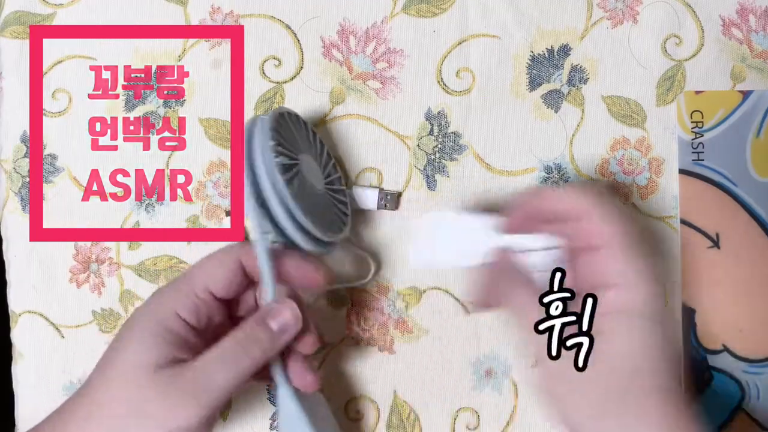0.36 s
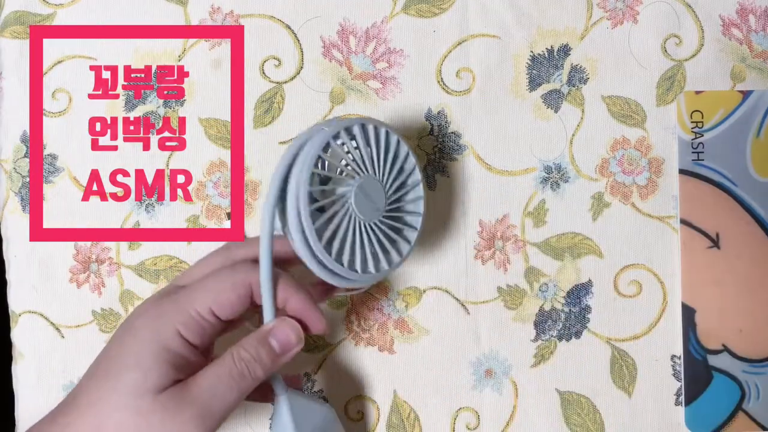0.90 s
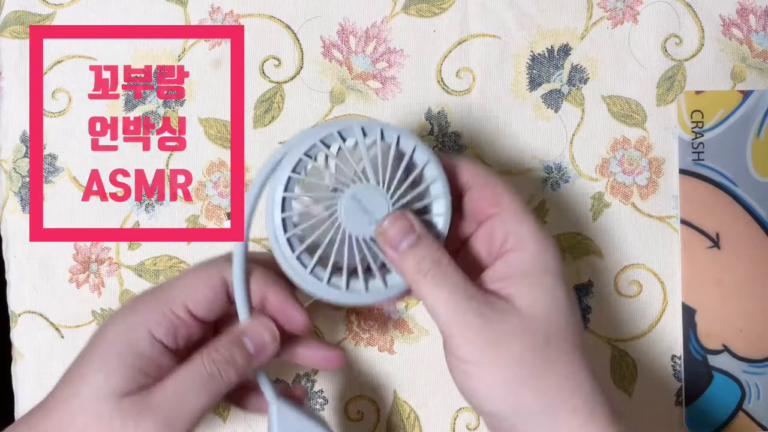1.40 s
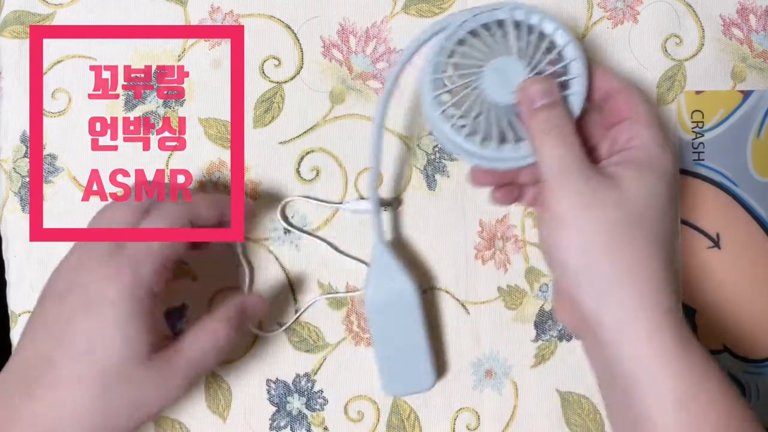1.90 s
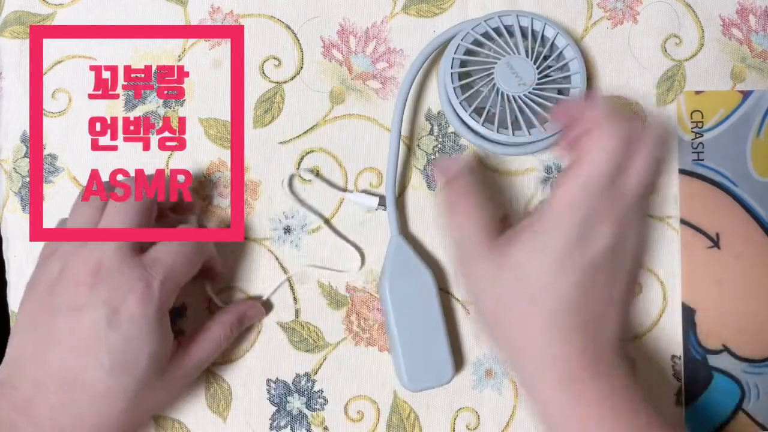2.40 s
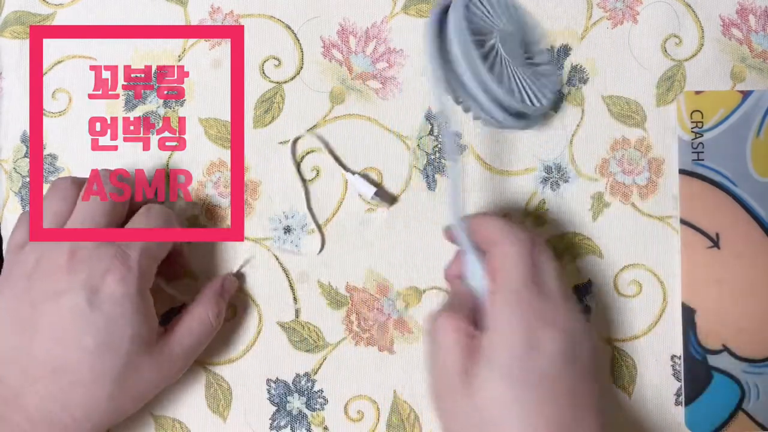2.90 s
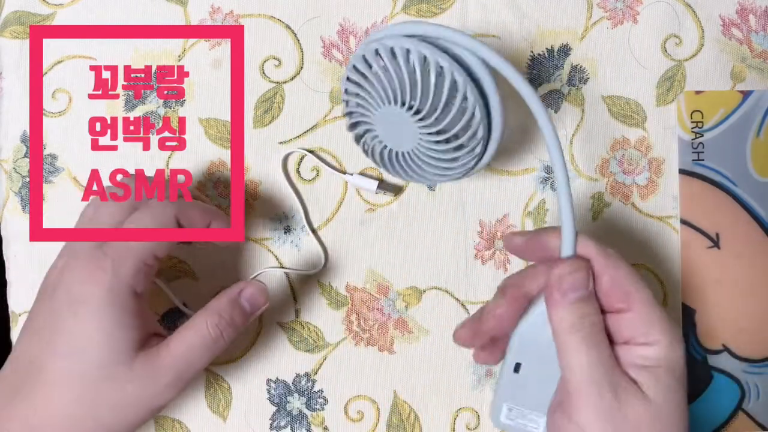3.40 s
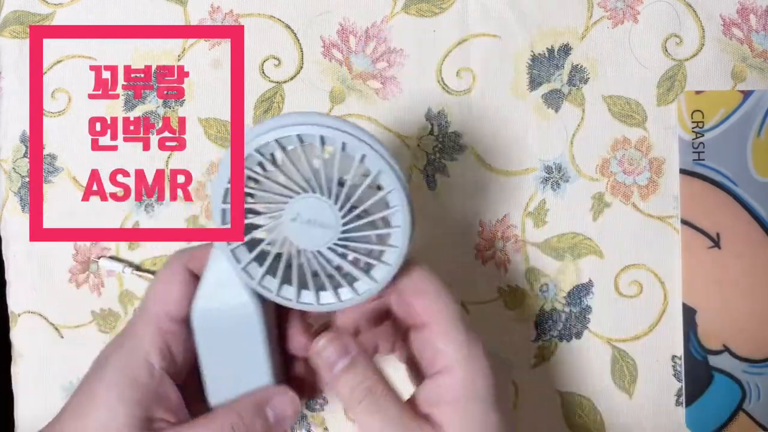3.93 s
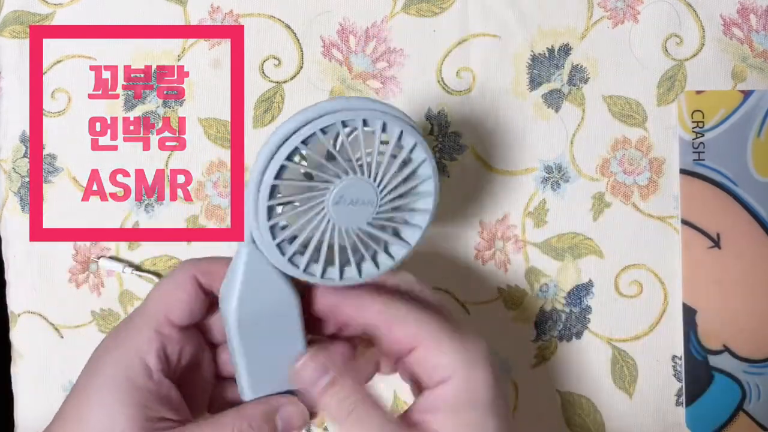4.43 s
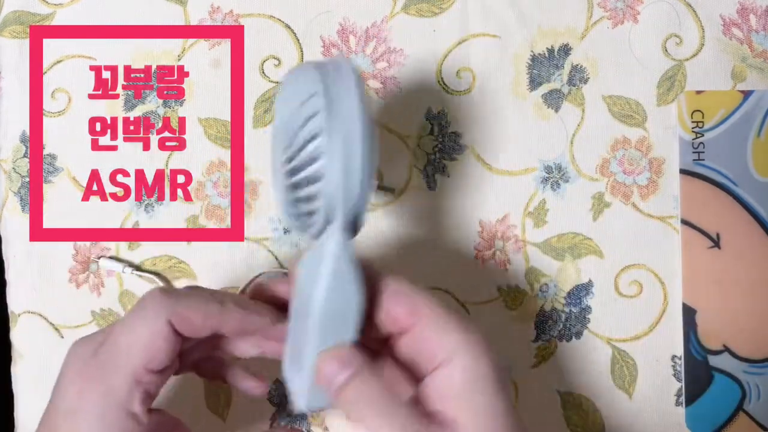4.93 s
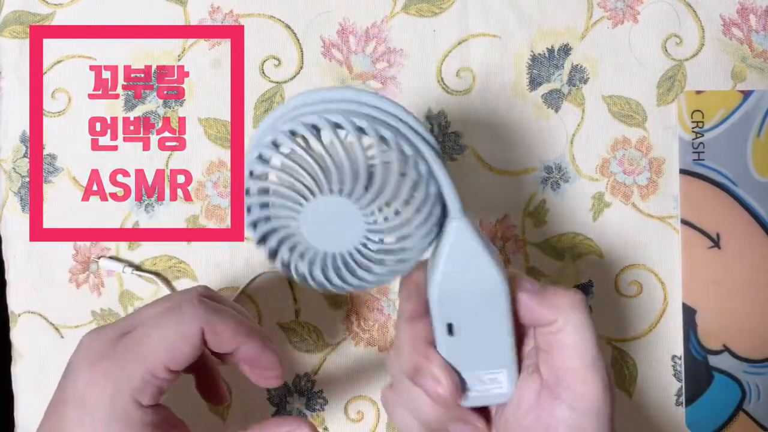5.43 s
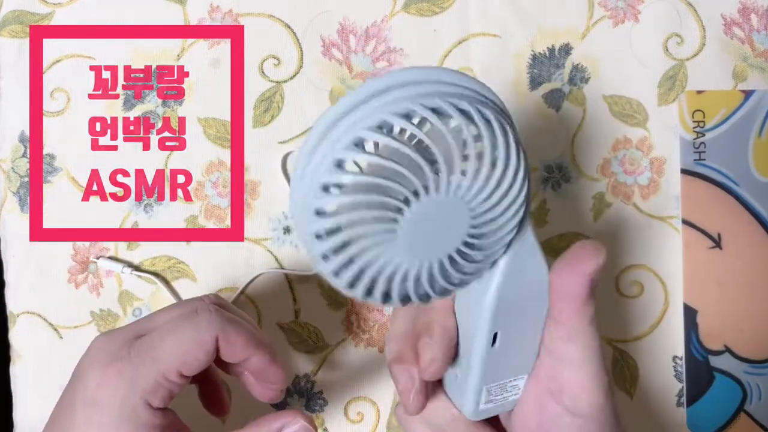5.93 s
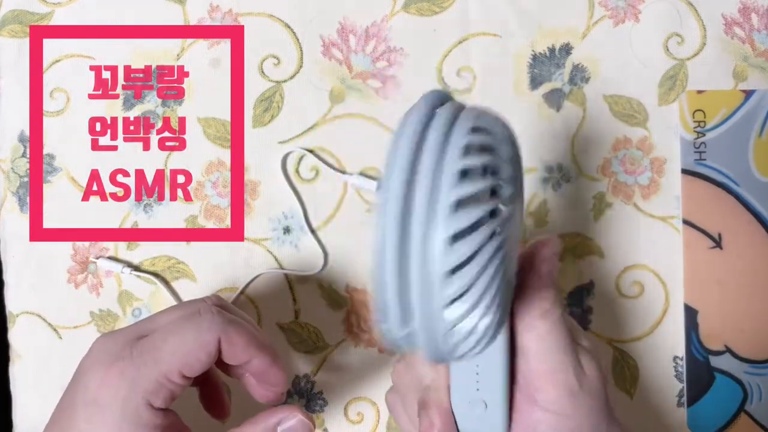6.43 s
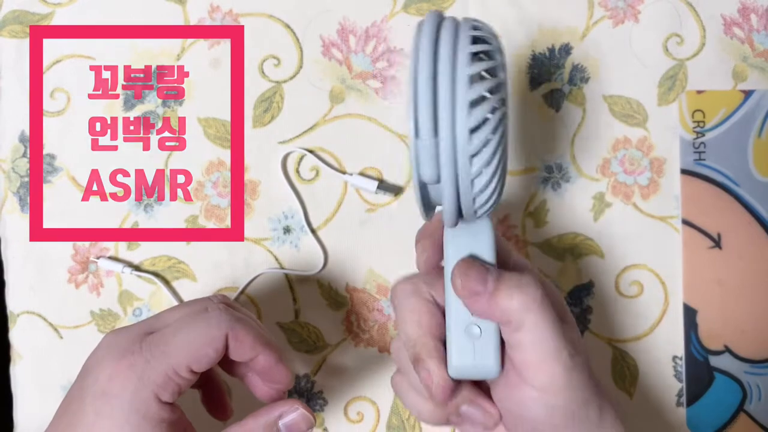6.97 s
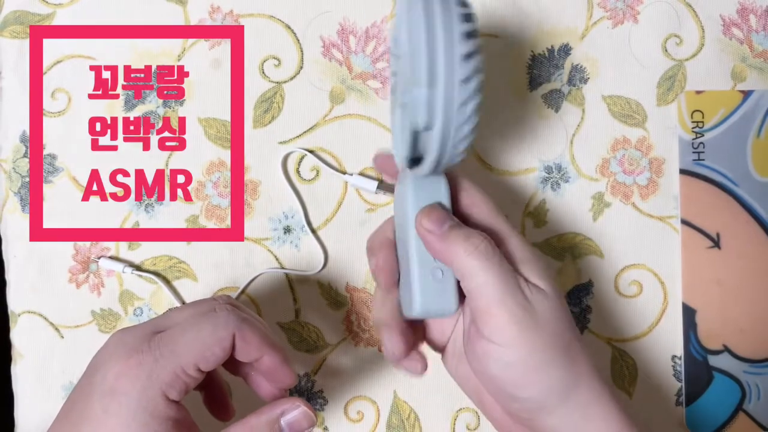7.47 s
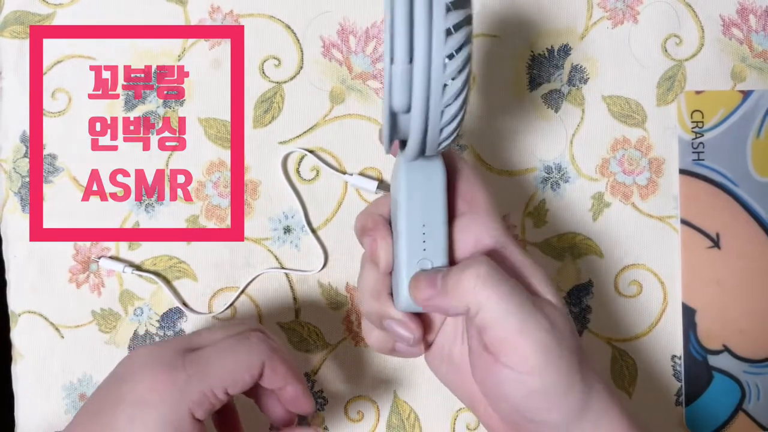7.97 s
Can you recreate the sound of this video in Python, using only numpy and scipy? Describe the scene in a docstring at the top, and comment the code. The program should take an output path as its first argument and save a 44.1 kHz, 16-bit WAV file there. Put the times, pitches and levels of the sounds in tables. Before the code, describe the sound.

Close plastic handling in a quiet room: a tossed scrap clacks down, the fan bumps a clothed table, then rubs and ticks continue.

```python
"""A quiet room: hands turn a small plastic fan and its cable over a cloth-covered table, close to the microphone.
Skin slides and squeaks on the shell as noise driving its resonances; parts tick as snaps and short puffs of noise
through a narrow resonance, a broader one and a bright crack. The fan and wrists bump the table top in falling
sweeps that ring it; a tossed scrap bounces twice further off, a burst of coloured noise over a ringing thud.
Behind it all an appliance hums and rumbles as wavering tones and narrow noise bands, under the hiss of the air."""
import sys
import numpy as np
from scipy import signal
from scipy.fft import rfft, irfft
from scipy.io import wavfile
from scipy.ndimage import uniform_filter1d

SR = 44100
rng = np.random.default_rng(int(sys.argv[2]) if len(sys.argv) > 2 else 0)


def decibels_to_gain(level_db):
    """Convert a level in decibels to a linear amplitude gain (20 dB per decade)."""
    exponent = np.asarray(level_db, float) / 20
    return 10 ** exponent


def dump(signal):
    """Clip the signal to [-1, 1] and save it as 16-bit WAV at the path in sys.argv[1]."""
    limited = np.clip(np.atleast_2d(signal).T, -1, 1)
    pcm = np.round(limited * 32767).astype(np.int16)
    wavfile.write(sys.argv[1], SR, pcm)


N = 356769  # length [samples]


def evened(x):
    """Scales to rms 1."""
    return x / np.sqrt(np.mean(x ** 2) + 1e-20)


def read(points, hz):
    """Reads a spectrum on a log-frequency axis."""
    f, value = np.transpose(points)
    return np.interp(np.log(hz + 1), np.log(f + 1), value)


def add(mix, s, sound):
    """Mixes a sound in at time s."""
    part = mix[round(s * SR):][:len(sound)]
    part += sound[:len(part)]


def resonate(x, hz, width):
    """Shifts hz down to zero, smooths with a one-pole, and shifts back: a resonance of gain 1."""
    turn = np.exp(2j * np.pi * np.cumsum(hz * np.ones(len(x))) / SR)
    r = np.exp(-np.pi * width / SR)
    return 2 * (turn * signal.lfilter([1 - r], [1, -r], x / turn)).real


def resonate_twice(x, hz, width, second_width):
    """Two resonances in a row at one pitch, for steeper skirts."""
    return resonate(resonate(x, hz, width), hz, second_width)


def coloured(x, points):
    """Filters by a spectrum, to rms 1."""
    gain = decibels_to_gain(read(points, np.fft.rfftfreq(len(x), 1 / SR)))
    return evened(irfft(rfft(x) * gain, len(x)))


def ringing(modes, t):
    """Sum of dying modes, peak 1."""
    ring = sum(decibels_to_gain(db - 60 * t / t60) * np.sin(2 * np.pi * hz * t) for hz, db, t60 in modes)
    return ring / abs(ring).max()


def wander(hz):
    """Slow chance movement up to hz, rms 1: twelve sines of random phase, the slow ones strongest."""
    t = np.arange(N) / SR
    rates = np.geomspace(hz / 20, hz, num=12)
    return evened(sum(np.sin(2 * np.pi * (f * t + rng.random())) / np.sqrt(f) for f in rates))


def sliding():
    """Tiny slips of skin hiss by themselves and ring the parts of the shell."""
    # colour of skin on plastic: (frequency [Hz], relative level [dB per Hz])
    skin_colour = [(1000, -10), (2000, -17), (4000, -8), (6500, -6), (9000, -7), (13500, -8),
                   (15500, -10.5), (16500, -38)]
    # resonances of the fan's parts: (frequency [Hz], width of the first pass [Hz], relative level [dB])
    handle = [(1750, 710, -4.5), (2400, 930, 3), (2750, 420, -1.5), (3160, 340, -3)]
    rim = [(3690, 1500, 2.5), (4350, 820, -6.5)]
    grille = [(5000, 690, 3), (5500, 590, -5), (6120, 1660, 1)]
    hiss, *ring_gains = strokes()
    # on average 1500 slips a second, of uneven size
    slips = decibels_to_gain(1.4 * np.minimum(rng.exponential(1, N), 5)) * (rng.random(N) < 1500 / SR)
    # the pressure of the grip flutters by 1.67 dB rms
    grip = decibels_to_gain(1.67 * evened(uniform_filter1d(rng.standard_normal(N), size=600)))
    drive = grip * (0.25 * evened(slips * rng.standard_normal(N)) + rng.standard_normal(N))
    rings = sum(gain * body(drive, part) for gain, part in zip(ring_gains, (handle, rim, grille)))
    sung, singing = squeaks()
    lock_db = -6  # a rub that sings on one mode feeds the others less
    skin = hiss * patchy(coloured(drive, skin_colour), db=2.5)
    return sung + decibels_to_gain(lock_db * singing) * rings + skin


def strokes():
    """Each stroke swells and fades; returns the gain of the hiss and of each part of the shell."""
    # strokes of the fingers: (middle [s], length [s], hiss of skin [dB], ring of the shell, shared out
    # among its parts [dB], pitch of the touched spot [Hz])
    finger_strokes = [(0.0, 0.061, -54, -60, 3770), (0.086, 0.031, -53, -60, 2930),
                      (0.192, 0.014, -62, -75, 3240), (0.328, 0.279, -61, -64.0, 3000),
                      (0.424, 0.057, -53.0, -63, 3050), (0.663, 0.066, -56, -67, 3540),
                      (0.79, 0.57, -76, -66.5, 3110), (1.238, 0.034, -58, -64, 4340),
                      (1.286, 0.19, -72.0, -74, 3650), (1.52, 0.23, -61.5, -82, 3560),
                      (1.603, 0.12, -69, -63.5, 3190), (1.758, 0.19, -64.5, -61, 2600),
                      (2.085, 0.31, -58, -60.5, 3450), (2.091, 0.047, -52.5, -56.5, 3680),
                      (2.342, 0.049, -55, -54, 3130), (2.522, 0.09, -55, -55.0, 3340),
                      (2.65, 0.13, -58, -59.0, 3130), (2.717, 0.086, -59, -64, 3040),
                      (2.787, 0.11, -54.5, -53.5, 3450), (3, 0.15, -58.5, -61, 3680),
                      (3.141, 0.097, -56.5, -53.5, 4400), (3.209, 0.053, -53.5, -50, 3890),
                      (3.37, 0.049, -55.5, -47.5, 2700), (3.511, 0.047, -63.0, -54.5, 2650),
                      (3.612, 0.05, -69, -59, 2770), (3.693, 0.099, -71.0, -61, 3670),
                      (3.895, 0.21, -58.5, -60.5, 4440), (4.093, 0.045, -61.5, -66, 4670),
                      (4.212, 0.055, -51.5, -64, 4470), (4.329, 0.16, -66, -74, 3180),
                      (4.498, 0.12, -70, -70.0, 2760), (4.57, 0.045, -71, -92.0, 3000),
                      (4.76, 0.13, -59, -64, 3320), (4.895, 0.053, -51, -55, 2700),
                      (4.901, 0.71, -74, -67, 2750), (5.014, 0.016, -58.5, -59, 3730),
                      (5.25, 0.056, -52.5, -45, 3280), (5.413, 0.17, -57.5, -58, 3570),
                      (5.492, 0.013, -54, -53, 3370), (5.564, 0.029, -61, -70, 3530),
                      (5.646, 0.1, -55.5, -57.5, 3090), (5.848, 0.062, -60, -60.5, 2730),
                      (6.026, 0.113, -84, -73, 2940), (6.123, 0.095, -76, -67.5, 2770),
                      (6.278, 0.18, -56.5, -60, 3970), (6.498, 0.093, -58, -65, 4350),
                      (6.583, 0.063, -56.5, -64, 3990), (6.741, 0.057, -59.5, -60.0, 3570),
                      (6.903, 0.21, -63, -63.5, 3450), (7.037, 0.11, -62.5, -58, 3640),
                      (7.182, 0.094, -58.0, -57, 3220), (7.34, 0.19, -65, -65.5, 3230),
                      (7.585, 0.081, -64.0, -61, 3990), (7.702, 0.117, -63.5, -63, 3760),
                      (7.825, 0.047, -61.0, -51.5, 4020), (7.975, 0.069, -77, -67.0, 3470)]
    # own pitch of handle, rim and grille: (frequency [Hz])
    part_hz = [2600, 4000, 5900]
    reach_octaves = 0.63  # how far a touch spreads to the next part
    edge_db, shape = -6.5, 1.37  # level at both ends of the length; shape 1 = pointed swell, 2 = round
    rest_hiss_db = -88  # hands merely holding
    t = np.arange(0, N + 64, 64) / SR
    s, length, hiss_db, ring_db, hz = np.transpose(finger_strokes)[:, :, None]
    swell_db = edge_db * abs(2 * (t - s) / length) ** shape
    near = np.exp(-(np.log2(hz / part_hz) / reach_octaves) ** 2)
    share = near / near.sum(axis=1, keepdims=True)
    # overlapping strokes add as powers
    rings = share.T @ decibels_to_gain(2 * (ring_db + swell_db))
    hiss = decibels_to_gain(2 * (hiss_db + swell_db)).sum(axis=0) + decibels_to_gain(2 * rest_hiss_db)
    return [np.interp(np.arange(N) / SR, t, np.sqrt(power)) for power in (hiss, *rings)]


def body(drive, modes):
    """Broad modes that share the energy differently as the contact moves over the part."""
    shift_db = 2.5  # how far the modes trade places, rms
    shares = [decibels_to_gain(db + shift_db * wander(hz=29.93)) for hz, width, db in modes]
    rings = [evened(resonate_twice(drive, hz, width, 1.56 * width)) for hz, width, db in modes]
    return sum(share * ring for share, ring in zip(shares, rings)) / np.linalg.norm(shares, axis=0)


def squeaks():
    """Rough noise through one narrow mode, swelling and fading with the rub; also returns when it sings."""
    # harder rubs that make one mode of the shell sing: (start [s], length [s], frequency [Hz], level [dB])
    rubs = [(0.64, 0.028, 2900, -62), (.645, 0.023, 6440, -54), (2.762, 0.029, 6460, -62),
            (3.13, 0.05, 4100, -56), (3.119, 0.076, 5100, -57), (3.186, 0.079, 3020, -57),
            (3.187, 0.073, 4380, -55), (3.183, .06, 5270, -55), (3.331, 0.079, 3000, -55.5),
            (3.338, 0.083, 2520, -63), (3.491, 0.033, 2620, -58), (3.659, 0.092, 3850, -63),
            (3.805, 0.15, 4900, -66), (4.882, 0.025, 2310, -48.5), (4.88, 0.031, 3420, -54),
            (4.886, 0.025, 4350, -55), (5.205, 0.041, 2830, -54), (5.232, 0.066, 4060, -59),
            (5.348, 0.042, 3900, -57), (7.02, 0.11, 4350, -66), (7.162, 0.033, 2750, -63),
            (7.53, 0.091, 4380, -64.5), (7.64, 0.12, 4220, -69), (7.798, 0.055, 4170, -54.5)]
    width_hz = 270
    out, singing = np.zeros((2, N))
    for (s, length, hz, db), noise in zip(rubs, rng.standard_normal((len(rubs), 8000))):
        sung = evened(resonate_twice(noise, hz, width_hz, 2 * width_hz))[1000:]  # past the build-up
        swell = signal.windows.tukey(round(length * SR), .6)
        add(out, s, decibels_to_gain(db) * swell * sung[:len(swell)])
        add(singing, s, swell)
    return out, np.minimum(singing, 1)


def patchy(x, db):
    """Colour that drifts in patches, db deep (rms), as the touching skin changes."""
    z = signal.stft(x, nperseg=256)[2]
    across_pitch = uniform_filter1d(rng.standard_normal(z.shape), size=8, axis=0)
    field = uniform_filter1d(across_pitch, size=24, axis=1)
    return evened(signal.istft(z * decibels_to_gain(db * evened(field)), nperseg=256)[1][:len(x)])


def ticks():
    """Each tick is a snap and a short puff of noise through a narrow resonance, a broader one and a bright crack."""
    # plastic ticks, peaks ahead of the common gain below: (time [s], ring peak [dB], pitch [Hz],
    # t60 of the puff ahead of its limits below [s], bright crack peak [dB])
    plastic_ticks = [(0.0796, -26.5, 1920, 0.0081, -29), (0.185, -64, 2970, 0.057, -51),
                     (0.3643, -43, 2400, 0.011, -70), (0.383, -35.5, 890, 0.0067, -62),
                     (0.3967, -50, 6200, 0.01, -54), (0.4439, -45, 2800, 0.023, -36),
                     (0.6512, -43.5, 2780, 0.069, -53), (0.6992, -53, 2170, 0.023, -44),
                     (0.875, -39, 4760, 0.0074, -55), (0.884, -44.5, 990, 0.011, -74),
                     (0.9064, -49.5, 5960, 0.03, -64), (0.9585, -51, 4000, 0.032, -72),
                     (1.2084, -55, 3420, 0.039, -50), (1.2424, -59, 3270, 0.014, -47),
                     (1.3384, -49, 1740, 0.029, -74), (1.555, -45, 1000, 0.05, -56),
                     (2.078, -50, 6520, 0.016, -57), (2.0995, -43, 3100, 0.044, -51),
                     (2.4521, -45, 2920, 0.045, -70), (2.457, -52, 900, .03, -70),
                     (2.4615, -41.5, 1550, 0.055, -59), (2.479, -46, 2820, 0.0077, -70),
                     (2.6616, -42, 3420, 0.021, -55), (3.4384, -49, 2240, 0.023, -57),
                     (3.4893, -44, 2940, 0.042, -51), (3.599, -48, 2000, 0.008, -64),
                     (3.715, -50, 2450, 0.043, -75), (3.931, -45.5, 4240, 0.016, -63),
                     (4.8825, -42, 3220, 0.042, -65), (4.8995, -45, 3200, 0.016, -52),
                     (5.2124, -56, 2820, 0.034, -70), (5.3435, -47, 2420, 0.035, -59),
                     (5.3752, -44, 4030, 0.021, -52), (5.455, -44, 4030, 0.032, -48),
                     (5.4862, -47, 3800, 0.023, -48), (5.4927, -48, 3810, 0.02, -46),
                     (5.5711, -38.5, 4370, 0.026, -48), (5.5792, -46, 2420, 0.03, -51),
                     (5.5975, -47, 2020, 0.023, -74), (5.6102, -39.5, 2270, 0.03, -46),
                     (5.666, -46, 2000, 0.023, -43), (5.9696, -56, 6500, 0.044, -63),
                     (5.996, -50, 2130, 0.019, -67), (6.0304, -53, 5320, 0.05, -54),
                     (6.0988, -45, 2280, 0.021, -51), (6.1257, -46, 2220, 0.011, -68),
                     (6.212, -46, 4440, 0.019, -59), (6.2601, -48, 4730, 0.05, -60),
                     (6.5223, -45, 2460, 0.015, -70), (6.7175, -38.5, 4340, 0.024, -47),
                     (6.9665, -49.5, 2700, 0.035, -70), (7.8158, -46, 4130, 0.06, -70),
                     (7.9197, -54, 3080, 0.027, -59), (7.9607, -53, 5400, 0.022, -58),
                     (8.0093, -41.5, 3680, 0.016, -62)]
    snap = 1.5  # size of the first sharp contact against the puff that follows
    out, t = np.zeros(N), np.arange(2500) / SR
    noises = rng.standard_normal((len(plastic_ticks), len(t)))
    for (s, db, hz, t60, crack_db), noise in zip(plastic_ticks, noises):
        puff = noise * decibels_to_gain(-60 * t / np.clip(t60, .002, .06)) * (1 - np.exp(-t / .0004))
        puff = puff + snap * (abs(t - .0004) < .5 / SR)
        wide_hz = np.sqrt(hz * 3400)  # the shell around the spot answers broadly
        spot = resonate_twice(puff, hz, 430, 1500)
        shell = resonate_twice(puff, wide_hz, 1.8 * wide_hz, 1.8 * wide_hz)
        ring = spot + 0.32 * shell
        crack = resonate_twice(puff, 8200, 9400, 9400)
        parts = [(db, ring), (crack_db, crack)]
        add(out, s, sum(decibels_to_gain(level_db) * part / abs(part).max() for level_db, part in parts))
    return 1.25 * out


def bumps():
    """Bending waves in the board carry treble fastest, so each bump falls in pitch; then the table rings."""
    # bumps on the table: (time [s], peak of the falling sweep [dB], first pitch [Hz],
    # time constant of the sweep [s], table ring against the sweep [dB])
    blows = [(1.56, -20.5, 408, 0.0038, -5), (1.884, -36, 410, 0.0026, -8), (1.9, -50, 140, 0.0072, 6),
             (2.1012, -25.5, 279, 0.0048, 2), (2.458, -32.5, 440, 0.00078, -19),
             (2.465, -29, 437, 0.0017, -14.5), (2.483, -36, 254, 0.0071, -2)]
    # modes of the table: (frequency [Hz], relative level [dB], t60 [s])
    table_modes = [(105, 19, 0.15), (133, -2.5, 0.19), (166, -10, 0.081), (198, -8, 0.1), (250, 5.5, 0.1),
                   (303, -27, 0.092), (386, 4.5, 0.11), (503, 7, 0.11), (660, -14, .07), (800, -9, .06)]
    board_hz = 97  # where the falling pitch settles
    # fall time of the pitch for a hard blow of hard_db; softer blows fall slower (dB per dB)
    fall_s, hard_db, slowing = 0.0069, -20, 0.42
    # the legs rock slowly, building up after the blow; their level is against the ring
    sway_hz, sway_s, sway_db = 60, 0.019, -16
    out, t = np.zeros(N), np.arange(20000) / SR
    sway = np.e * t / sway_s * np.exp(-t / sway_s) * np.sin(2 * np.pi * sway_hz * t)
    for s, db, hz, length, ring_db in blows:
        fall = fall_s * decibels_to_gain(slowing * (hard_db - db))
        turns = board_hz * t + (hz - board_hz) * t / (1 + t / fall)
        sweep = np.sin(2 * np.pi * turns) * t * np.exp(-t / length)
        ring = signal.oaconvolve(sweep, ringing(table_modes, t))[:len(t)]
        sound = sweep / abs(sweep).max()
        sound = sound + decibels_to_gain(ring_db) * ring / abs(ring).max()
        sound = sound + decibels_to_gain(ring_db + sway_db) * sway
        add(out, s, decibels_to_gain(db) * sound)
    return out


def scrap():
    """A dry crack of uneven contacts, a short rattle as it settles, and the thud of the surface."""
    # the scrap lands flat, then on its edge: (time [s], level of the whole bounce [dB],
    # treble tilt above 3500 Hz [dB an octave], t60 of the crack [s], thud within the bounce [dB])
    bounces = [(0.758, -11.5, 1, 0.027, 0.5), (0.7862, -2, 0, 0.026, -11)]
    # colour of the scrap: (frequency [Hz], relative level [dB per Hz])
    scrap_colour = [(400, -29), (750, -11.5), (1000, -5), (1280, 1.5), (1600, -5.5), (2500, -6),
                    (3300, -3.5), (4100, -4.5), (5300, -11.5), (6600, -6.5), (8000, -15.5), (11300, -18),
                    (16000, -23)]
    # modes of the surface it lands on: (frequency [Hz], relative level [dB], t60 [s])
    surface_modes = [(188, -13.5, 0.12), (237, -8.5, .1), (294, -13, 0.14), (345, 5, 0.059), (372, -2, .12),
                     (463, -7, 0.11), (603, -11, 0.14), (668, -10, 0.1)]
    rattle_db = -14  # the scrap settling, below its crack
    out, t = np.zeros(N), np.arange(12000) / SR
    for s, db, tilt_db, t60, thud_db in bounces:
        colour = [(hz, level_db + tilt_db * max(np.log2(hz / 3500), 0)) for hz, level_db in scrap_colour]
        # each contact lasts 20 samples
        uneven = decibels_to_gain(3.5 * np.minimum(rng.exponential(1, len(t) // 20), 2.5).repeat(20))
        crack = coloured(uneven * rng.standard_normal(len(t)), colour) * decibels_to_gain(-60 * t / t60)
        rattle = coloured(rng.standard_normal(len(t)), colour) * decibels_to_gain(rattle_db - 60 * t / 0.09)
        dry_contact = 0.37 * (crack + rattle) * (1 - np.exp(-t / 0.00018))
        thud = ringing(surface_modes, t) * (1 - np.exp(-t / 0.0066))
        add(out, s, decibels_to_gain(db) * (dry_contact + decibels_to_gain(thud_db) * thud))
    return out


def background():
    """Air noise, fuzzy motor rumble, a slightly wavering hum and a fainter drone."""
    # colour of the room's air: (frequency [Hz], relative level [dB per Hz])
    air_colour = [(76, -16.5), (130, -9), (147, -34), (172, -13.5), (386, -17), (678, -15.5), (750, -21.5),
                  (829, -15.5), (1010, -21), (1290, -18.5), (1490, -24), (13300, -43.5), (16000, -62)]
    # fuzzy bands of the motor: (frequency [Hz], width of each of two passes [Hz], level [dB])
    rumble_bands = [(43, 17, -66.5), (52.6, 9.5, -62.5), (91, 14, -72), (156.4, 6, -71), (247.8, 37, -69.5)]
    # a second motor tone that comes and goes: (time [s], level [dB])
    drone_levels = [(0, -69), (1.2, -69.5), (2.2, -82), (2.6, -62), (3.1, -70), (4.6, -81), (4.9, -69),
                    (5.4, -66), (6.4, -77), (7.3, -71.5), (8.09, -62.5)]
    air_db = -56.5
    hum_hz, hum_db, hum_waver_db = 119.9, -52, .9
    drone_hz = 193.3
    t = np.arange(N) / SR
    air = decibels_to_gain(air_db + 0.55 * wander(hz=5.2)) * coloured(rng.standard_normal(N), air_colour)
    noise = rng.standard_normal(N)
    rumble = sum(decibels_to_gain(db) * evened(resonate_twice(noise, hz, width, width)) for hz, width, db in rumble_bands)
    # sqrt(2) gives a sine rms 1; its phase wanders too
    hum_tone = np.sqrt(2) * np.sin(2 * np.pi * hum_hz * t + 0.25 * wander(hz=3))
    hum = decibels_to_gain(hum_db + hum_waver_db * wander(hz=8.5)) * hum_tone
    drone_tone = np.sqrt(2) * np.sin(2 * np.pi * drone_hz * t + 0.68 * wander(hz=5.8))
    drone = decibels_to_gain(np.interp(t, *np.transpose(drone_levels))) * drone_tone
    return air + rumble + hum + drone


def room(x):
    """Echoes of the room: sparse taps of random sign, each band dying at its own speed."""
    # decay of the room: (frequency [Hz], t60 [s])
    decay = [(250, 0.28), (1000, 0.19), (4000, 0.16), (12000, 0.17)]
    taps = np.zeros(SR // 2)
    at = np.arange(200, len(taps) - 20, 20)  # one tap in every 20 samples
    taps[at + rng.integers(0, 20, len(at))] = rng.choice([-1., 1.], len(at))
    hz, t, z = signal.stft(taps, SR, nperseg=256)
    tail = signal.istft(z * decibels_to_gain(-60 * t / read(decay, hz)[:, None]), SR, nperseg=256)[1]
    return signal.oaconvolve(x, tail / np.linalg.norm(tail))[:N]


def scene():
    """Near handling, table bumps, the scrap further off with more echo, and the room behind."""
    near, far, knocks = sliding() + ticks(), scrap(), bumps()
    wet = room(decibels_to_gain(-17.5) * near + decibels_to_gain(-10.5) * far + decibels_to_gain(-12.5) * knocks)
    return (near + far + knocks + wet + background())[None]


def band_limit(x):
    """A steep low-pass at the top of the band."""
    return signal.sosfilt(signal.butter(12, 16840, fs=SR, output="sos"), x)


def record(dry):
    """The microphone rolls off at the top, near 15.8 kHz."""
    rolloff = signal.firwin(numtaps=101, cutoff=15800, fs=SR)
    rolled = signal.oaconvolve(dry, rolloff[None], "same")
    return band_limit(rolled)


dry = scene()
out = record(dry)
dump(out)
```